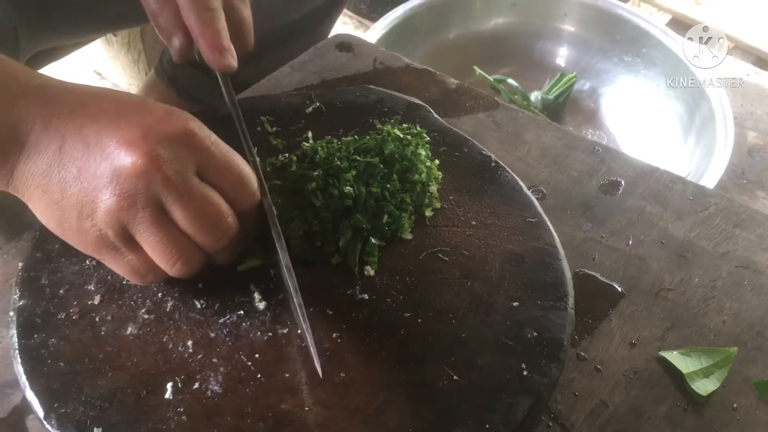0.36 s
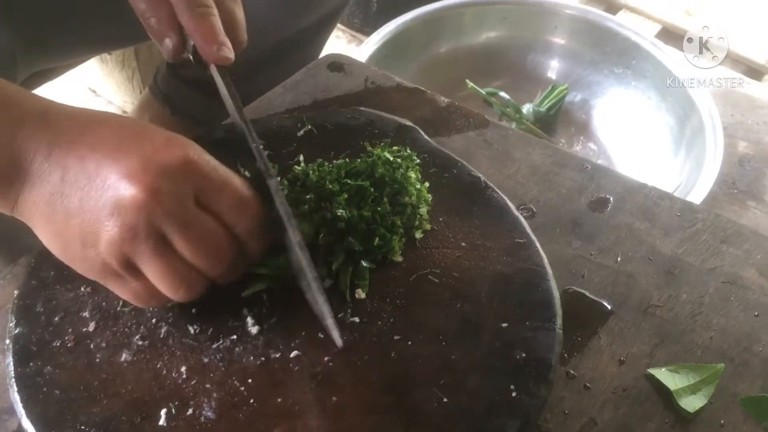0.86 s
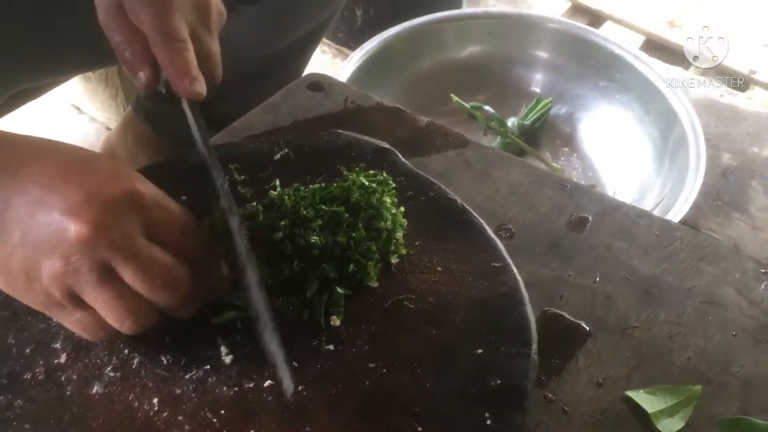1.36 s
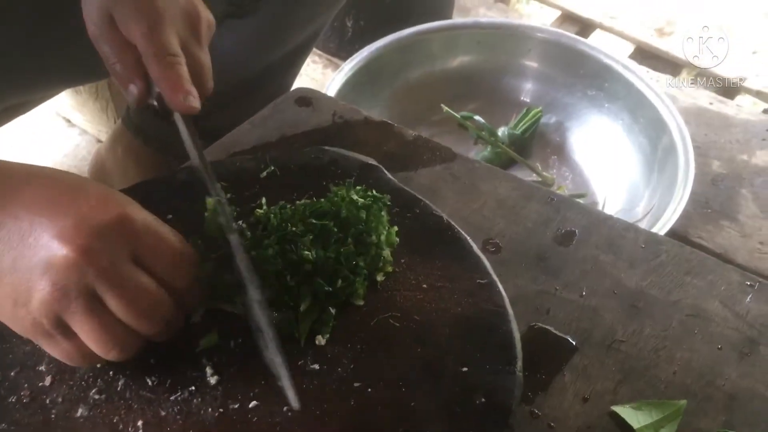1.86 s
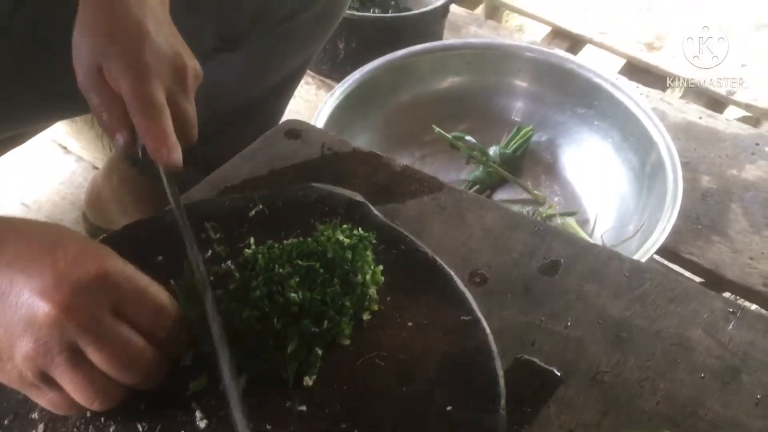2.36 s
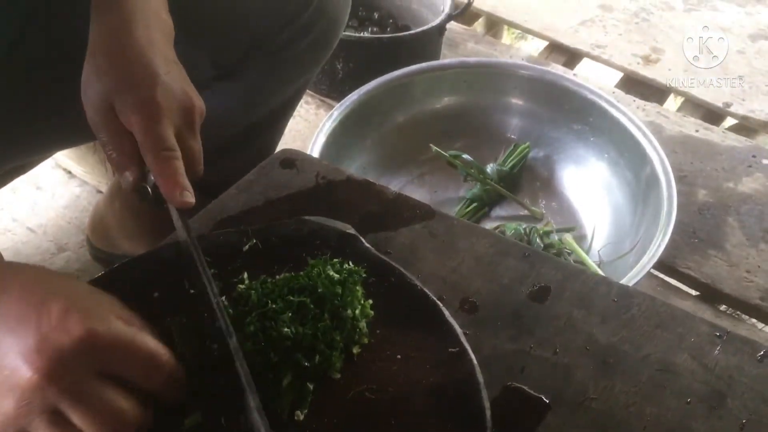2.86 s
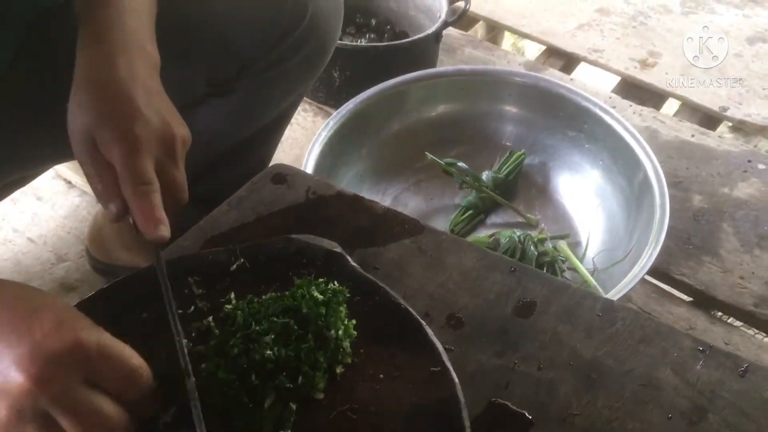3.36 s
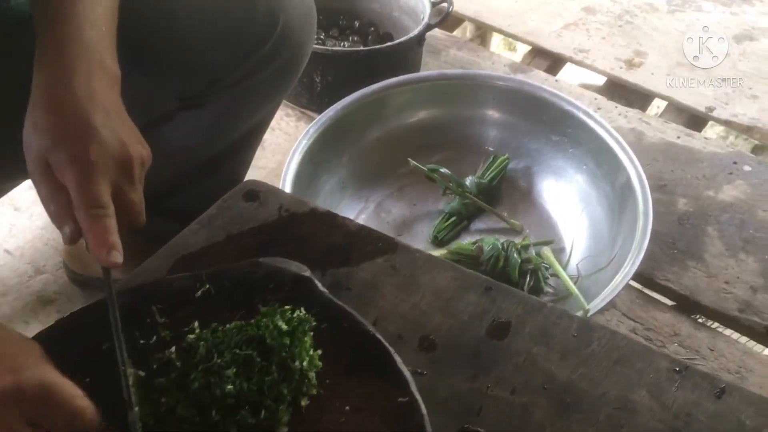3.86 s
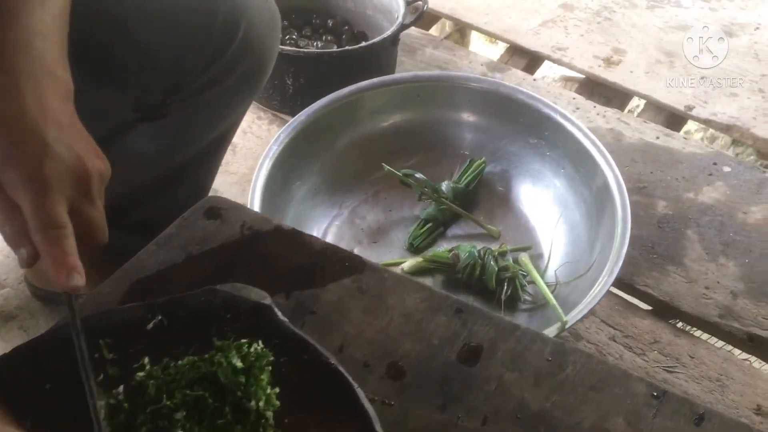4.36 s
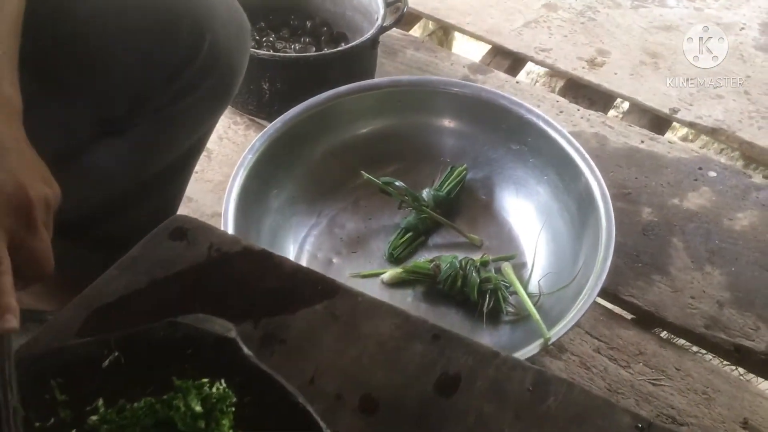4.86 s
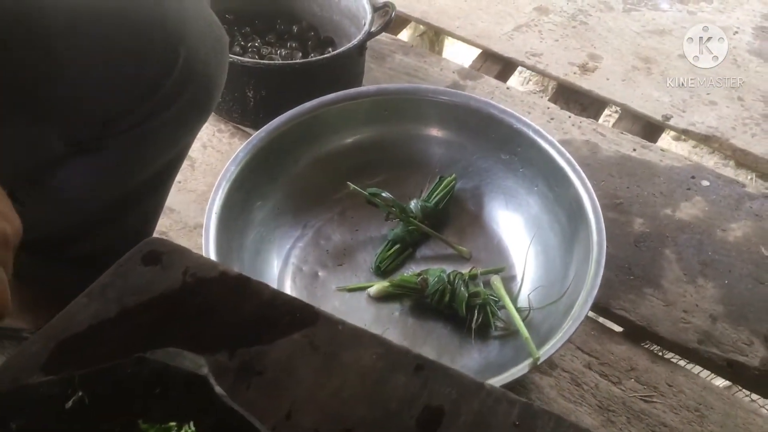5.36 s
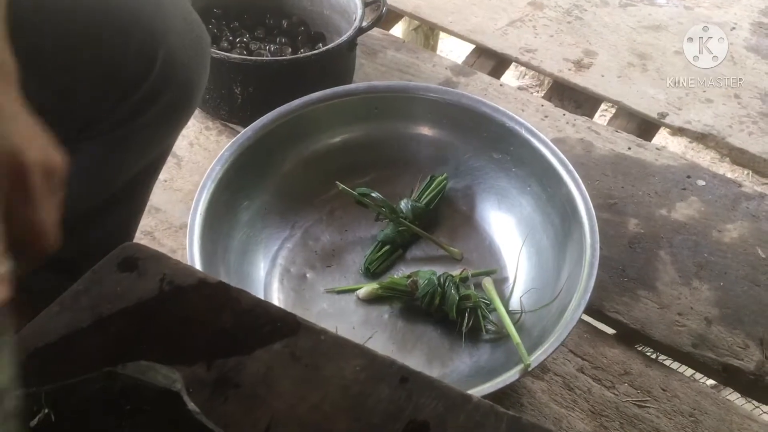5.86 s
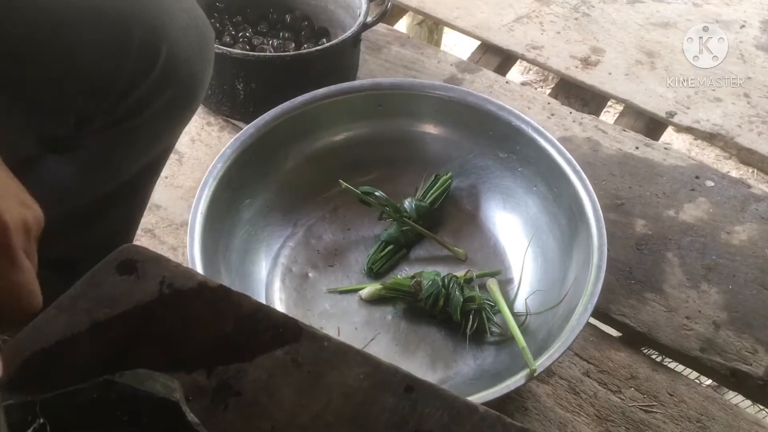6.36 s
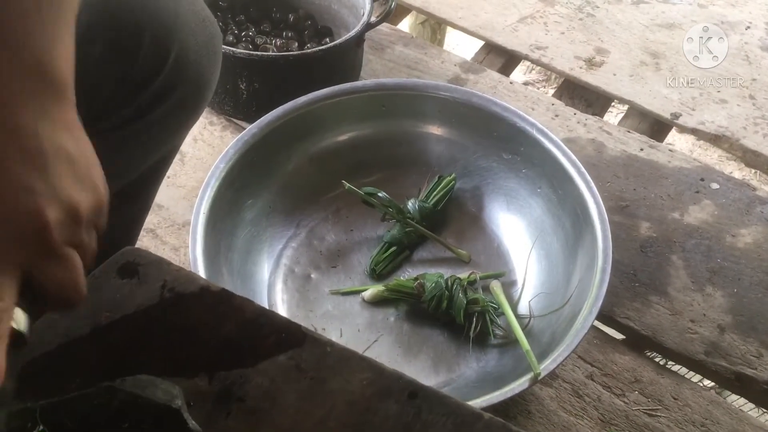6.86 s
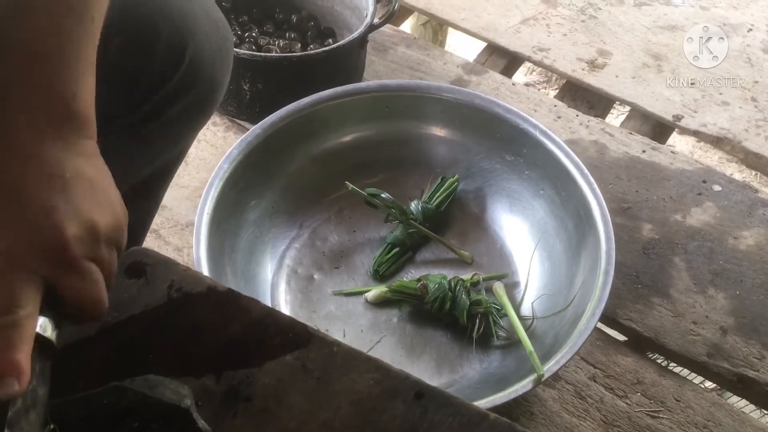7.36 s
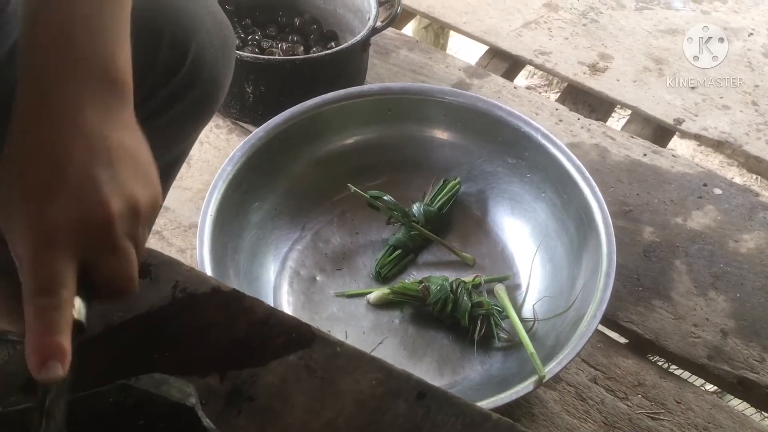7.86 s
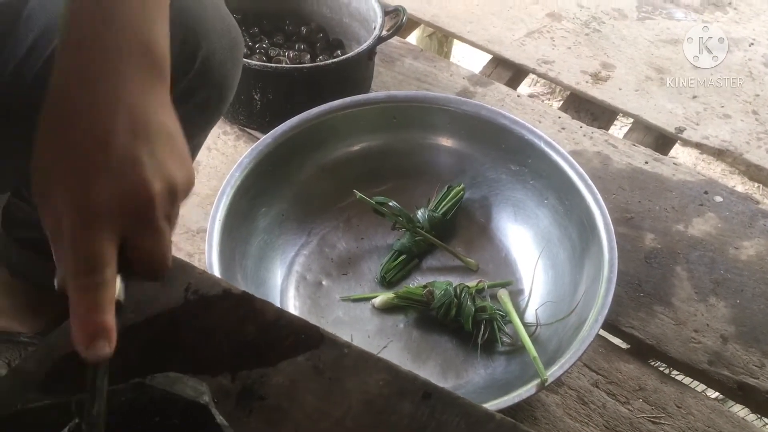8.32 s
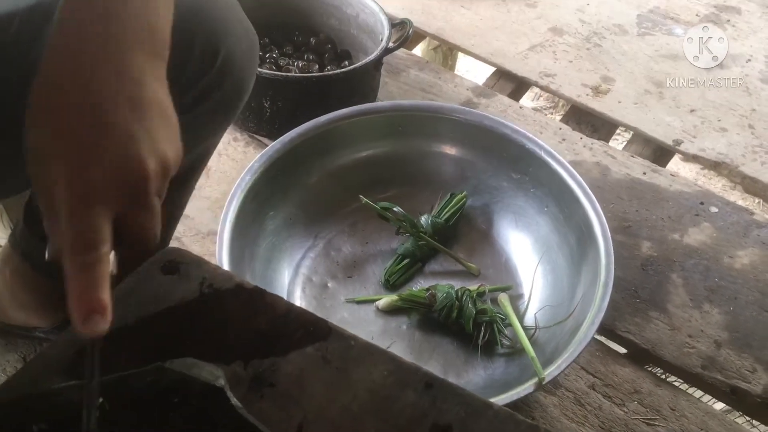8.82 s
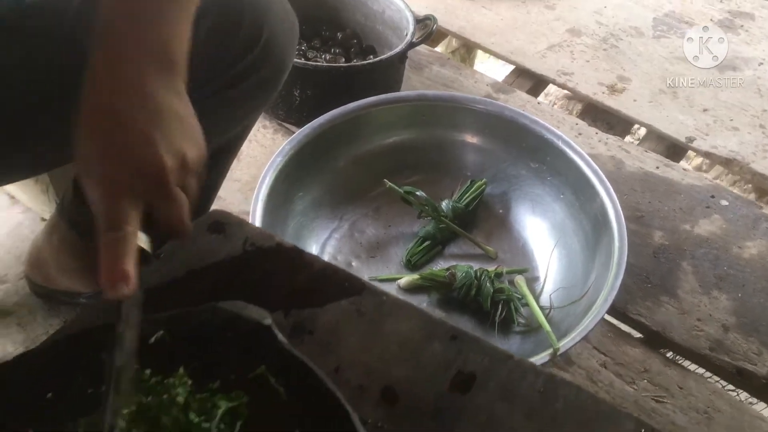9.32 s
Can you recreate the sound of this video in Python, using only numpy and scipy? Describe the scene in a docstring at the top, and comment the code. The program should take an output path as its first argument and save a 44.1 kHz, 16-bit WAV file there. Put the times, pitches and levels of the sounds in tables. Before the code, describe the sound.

A blade chops leafy stems on a thick wooden block in sharp loud knocks with short pauses, then rocking double-hit cuts with leafy scratches.

```python
"""A cleaver chops herbs on a thick round wooden block in an open kitchen, close to a phone that overloads.
Each blow is a short push that rings the block's modes and cracks; late rocking cuts land belly, then heel.
Noise puffs make stems crunch and the hand bump the block; damped sines make the blade clink and squeak.
Floor and walls answer with decaying noise. Crackling leaves, yard murmur and a far insect are shaped noise."""
import sys
import numpy as np
from scipy import signal
from scipy.io import wavfile

SR = 44100
rng = np.random.default_rng(int(sys.argv[2]) if len(sys.argv) > 2 else 0)


def master_out(mix):
    """Clip the mix to full scale and print it as 16-bit PCM to the path in sys.argv[1]."""
    frames = np.transpose(np.atleast_2d(mix))
    ceiling = np.clip(frames, -1, 1)
    pcm = np.round(ceiling * 32767).astype(np.int16)
    wavfile.write(sys.argv[1], SR, pcm)


def ratio(d):
    """dB to gain"""
    e = np.asarray(d, float) / 20
    return 10 ** e


N = 417186

# Straight chops. Each row: landing in seconds, strength in dB, contact time constant in ms,
# crunch of the stems cut just before in dB, spot (0 near edge, 1 middle of the block).
CHOPS = [(0.0836, -3, 0.18, -20, 0.16), (0.375, -12, 0.39, -26.5, 0.3), (0.933, -2.5, 0.07, -22.5, 0.13),
         (1.1726, -4, 0.051, -25, 0.22), (1.4131, 0.84, 0.018, -24, 0.2), (1.9315, 0.7, 0.016, -31, 0.24),
         (2.1693, 1.4, 0.041, -28, 0.18), (2.3915, 0.7, 0.023, -40.5, 0.21), (3.0974, -1, 0.02, -60, 0.25),
         (3.3608, 1.8, 0.0095, -35, 0.26), (3.595, 0.66, 0.029, -30.5, 0.21),
         (3.828, 0.3, 0.016, -33.5, 0.24), (4.336, 0.5, 0.041, -33, 0.76), (4.5793, 0.8, 0.059, -31, 0.83),
         (4.8238, 1, 0.048, -39.5, 0.8), (5.0775, 0.4, 0.05, -45, 0.81), (5.3397, 1, 0.039, -44.5, 0.77),
         (5.5915, 1.2, 0.02, -45, 0.76), (6.135, -3.5, 0.32, -71, .26)]
# Rocking cuts. Each row: belly landing in seconds, belly strength in dB, heel delay in seconds,
# heel strength in dB, heel contact time constant in ms.
ROCKS = [(6.7896, 2.23, .0159, -3, 0.27), (7.197, 2.13, 0.011, 2.2, 0.13), (7.6204, 1.67, .0136, 3, 0.2),
         (8.0365, 2, 0.013, 4.5, 0.21), (8.436, -1.5, .0247, -5.5, 0.34), (8.863, 2.5, .014, 5.5, 0.24),
         (9.2826, 0.5, 0.013, 4, 0.21)]
BELLY_SPOT, BELLY_SPOT_PER_DB, BELLY_CONTACT_MS = 0.5, 0.44, 0.31  # harder cuts land further in
HEEL_SPOT, HEEL_SPOT_PER_DB = 1.985, 0.01  # spot 2 is the heel's place
# Blade set down lightly on the block. Each row: time in seconds, strength in dB.
TAPS = [(4.721, -21), (4.778, -19.5)]
TAP_SPOT, TAP_CONTACT_MS = 0.3, 0.25

# Modes of the block. Each row: frequency in Hz, T60 in seconds, signed gain when struck at spot 0, 1, 2.
BLOCK_MODES = [(56.3, 0.19, 0.0296, 0.0265, -0.012), (76, 0.17, -0.053, -0.0305, 0.0036),
               (145.8, 0.19, 0.13, 0.11, -0.153), (194, 0.13, 0.24, 0.18, 0.21),
               (260, 0.08, 0.21, 0.12, 0.076), (290.5, 0.074, -0.64, -0.48, 0.2),
               (313, 0.14, 0.083, 0.0044, 0.23), (366.6, 0.098, -0.15, -0.15, 0.17),
               (486, 0.026, 0.37, 0.27, -0.83), (584, 0.14, -0.014, -0.075, 0.069),
               (638, 0.068, -0.097, -0.24, 0.052), (721, 0.024, -0.24, 0.035, -0.45),
               (785, 0.089, 0.01, 0.15, 0.079), (902, 0.035, -0.37, -0.35, 0.13),
               (980, 0.035, 0.37, 0.78, -0.068), (1043, 0.03, -0.71, -0.019, 0.4),
               (1104, 0.085, 0.1, 0.17, 0.034), (1236, 0.032, 0.23, 0.28, -0.055),
               (1353, 0.076, -0.37, -0.32, -0.044), (1446.4, 0.036, 0.99, 0.22, 0.21),
               (1530, 0.032, -0.51, -0.21, -0.42), (1636, 0.029, 1, -0.83, 0.013),
               (1882, 0.022, -0.46, 0.31, -0.0015), (2051, 0.027, -0.31, 0.31, 0.063),
               (3001, 0.014, 0.35, -0.5, 0.31)]
MODE_SPREAD_DB = 1.3
# Late steel ring of the heel. Columns: frequency in Hz, T60 in seconds, level in dB for a 0 dB landing.
HEEL_RING = (4170, .13, -62)
HEEL_RING_LAG_S = 0.008

CRACK_DB, CRACK_DB_PER_MS, CRACK_DB_PER_SPOT = -26, -26, -2.5  # last: past the middle only
CRUNCH_LEAD_S, CRUNCH_LEAD_S_PER_MS = 0.003, 0.0046  # soft contacts crunch earlier
CRUNCH_HZ, CRUNCH_DULLING_PER_MS, CRUNCH_S = 9400, 5.4, 0.0031  # and lower
BITE_LEAD_S, BITE_DB, BITE_HZ = 0.0053, -38, 2240  # dB against the belly strength
# Lone snaps and scratches in the heap. Each row: start in seconds, level in dB, centre in Hz, hold in seconds.
SNAPS = [(0.327, -26, 6300, 0.0052), (0.685, -41.5, 6600, 0.0016), (0.8375, -31, 8000, 0.0016),
         (5.932, -46, 4170, 0.048), (6.015, -47, 1850, 0.017), (6.886, -42, 7000, .006),
         (7.093, -47.5, 4000, 0.038), (7.327, -42.5, 8000, 0.019), (7.644, -58, 4640, 0.04),
         (7.683, -40, 2950, .012), (7.72, -48.5, 4470, 0.016), (7.779, -44, 6000, .003),
         (7.797, -52, 3300, 0.0057), (7.874, -37, 8000, 0.0019), (8.137, -34, 12400, 0.0023),
         (8.732, -39.5, 6200, 0.004), (9.205, -52.5, 1500, 0.034)]
# Blade slides through the leaves after a rocking cut. Each row: start in seconds, level in dB.
SLIDES = [(6.824, -40.5), (8.098, -43), (8.503, -44.5), (8.934, -45.5), (9.307, -42)]
SLIDE_HZ, SLIDE_S = 7660, 0.058
RUB_HZ, RUB_DB, RUB_LAG_S = 1540, -7, 0.018  # dB against the slide

# Blade touches something hard. Each row: time in seconds, steel ring in dB, place on the blade from 0 to 2,
# dull knock in dB.
CLINKS = [(2.9969, -29.5, 0.042, -34.5), (3.048, -40.5, 1, -33), (3.8033, -43.5, 1.8, -40.5),
          (3.885, -45, 0.2, -33), (4.7204, -35.5, .5, -38.5), (6.7183, -39, 1.1, -34.5),
          (6.934, -34, 2.03, -38.5)]
# Blade mode frequencies in Hz.
BLADE_HZ = [1810, 4368, 4792, 5130, 5620, 6580, 7400, 7784, 8750, 11800, 13000]
# One row per blade mode: T60 in seconds, relative dB when touched at place 0, 1, 2.
BLADE_MODES = [(0.078, 2.5, -13.5, 8.5), (0.18, 4, -24.5, -7.5), (0.11, 4, -13, -21.5),
               (0.047, -12, -24.5, -8), (0.16, -17.5, -8, -2.5), (0.12, -25, -9, -5.5), (.1, -22, -4, -23),
               (0.091, -2.5, -13, -29.5), (0.12, -21.5, -1.5, -10.5), (0.1, -14, -9.5, -25.5),
               (0.078, -21.5, -6, -8.5)]
CLINK_KNOCK_HZ = 770
# Edge drags over the wood. Columns: start in seconds, hold in seconds, level in dB.
DRAG = (3.882, 0.026, -37)
# Gliding bands of the drag. Each row: starting frequency in Hz, glide in Hz per second, relative dB.
SQUEAK = [(1070, 2600, 3), (1950, -1000, -1), (2203, 301, -3)]
SQUEAK_WAVER_TOP_HZ, SQUEAK_T60_S = 210, 0.2
# Stiff stem flicks against the blade. Each row: time in seconds, ring level in dB.
FLICKS = [(7.9114, -35.5), (7.9647, -37)]
FLICK_HZ, FLICK_T60_S = 1950, 0.066
FLICK_CLICK_DB, FLICK_CLICK_HZ, FLICK_CLICK_T60_S = -2.5, 4070, 0.069  # dB against the ring
# Hand bumps the block. Each row: time in seconds, level in dB, centre in Hz.
BUMPS = [(0.33, -25, 88), (0.523, -41.5, 460), (5.263, -37, 406), (6.723, -40, 253), (8.605, -42.5, 304)]

# Diffuse answer of floor boards and walls. Each row: frequency in Hz, relative dB, T60 in seconds.
TAIL = [(49.4, 7.5, 0.62), (130, -3.5, 0.43), (328, -4, 0.17), (705, 2.5, 0.17), (1500, -1.5, 0.18),
        (2400, -0.5, 0.087), (4000, -3.5, 0.31), (8000, -2.5, 0.074), (15000, -3.5, 0.054)]
TAIL_DB = -36.5
# Blow reaching the floor boards directly. Columns: low edge in Hz, high edge in Hz, gain in dB.
FLOOR_PATH = (690, 2000, 18)
# Leaves pushed about. Each row: time in seconds, level between 3 and 9 kHz in dB.
RUSTLE = [(0.0, -59), (0.61, -61), (0.79, -55.5), (0.97, -63.5), (1.68, -60), (1.87, -62.5), (2.79, -61.5),
          (3.0, -61), (3.69, -62), (4.27, -57.5), (6.35, -57), (6.68, -54.5), (6.76, -45), (6.81, -52.5),
          (7.0, -51.5), (7.53, -55.5), (7.59, -56.5), (7.65, -44.5), (7.85, -52.5), (8.03, -60.5),
          (8.17, -66), (9.46, -65.5)]
# Leaf spectrum. Each row: frequency in Hz, relative dB per Hz.
LEAVES = [(530, -40), (900, -8.5), (991, -12), (1970, -3.5), (2450, -6.5), (4250, -1.5), (10200, -9.5),
          (12900, -16.5), (16000, -12)]
TICKS_PER_S, TICK_DB, TICK_T60_CYCLES = 5, 13, 90  # per band
# Murmur spectrum of the yard. Each row: frequency in Hz, relative dB per Hz.
AIR = [(18, -33), (30, -5.5), (71, -0.5), (204, 1), (721, -13), (1390, -8), (2540, -21), (4080, -12),
       (4910, -30), (12600, -35.5), (16000, -29.5)]
AIR_DB = -56
# Faint thin buzz far off. Columns: start in seconds, end in seconds, centre in Hz, half width in Hz, level in dB.
INSECT = (8.19, 8.76, 6620, 150, -73)
CEILING, CUTOFF_HZ = 0.97, 16500


def rms_one(x):
    """Scales to an rms of 1."""
    return x / np.sqrt(np.mean(x ** 2) + 1e-20)


def at_hz(points, hz, column=1):
    """Reads a table column at hz, on a log frequency axis."""
    table = np.array(points)
    return np.interp(np.log(hz), np.log(table[:, 0]), table[:, column])


def band(x, low_hz, high_hz):
    """Butterworth band-pass."""
    edges_hz = [low_hz, min(high_hz, 0.45 * SR)]
    return signal.sosfilt(signal.butter(2, edges_hz, "band", fs=SR, output="sos"), x)


def half_octaves(low_hz, count):
    """Low edge, high edge and centre of each half octave, in Hz."""
    edges = low_hz * 2 ** (np.arange(count + 1) / 2)
    return zip(edges, edges[1:], np.sqrt(edges[1:] * edges[:-1]))


def drift(corner_hz):
    """Slow chance of spread 1: noise through a double pole, at one value per 40 samples."""
    r = np.exp(-80 * np.pi * corner_hz / SR)
    noise = rng.standard_normal(N // 40 + 2002)
    slow = signal.lfilter([1], [1, -2 * r, r * r], noise)[2000:]
    return np.interp(np.arange(N) / 40, np.arange(len(slow)), rms_one(slow))


def ring(force, hz, t60_s):
    """Damped resonator: a unit click sets a sine of height 1 ringing."""
    r, w = ratio(-60 / (t60_s * SR)), 2 * np.pi * hz / SR
    return signal.lfilter([0, np.sin(w)], [1, -2 * r * np.cos(w), r * r], force + 1e-18)


def add(out, start_s, sound):
    """Mixes a sound in at its start, cut at the end of the scene."""
    i = round(start_s * SR)
    out[..., i:i + sound.shape[-1]] += sound[..., :N - i]


def puff(db, hz, t60_s, hold_s=0, rise_s=0.00023, octaves=0.59):
    """Crackly noise, octaves to either side of hz, that rises, holds, then dies."""
    t = np.arange(round(0.3 * SR)) / SR
    grains = rng.standard_normal(len(t)) * ratio(3.8 * rng.standard_normal(len(t)))
    shape = (1 - np.exp(-t / rise_s)) * ratio(-60 * np.maximum(t - hold_s, 0) / t60_s)
    return ratio(db) * shape * rms_one(band(grains, hz * 2 ** -octaves, hz * 2 ** octaves))


def scratch(db, hz, hold_s):
    """Broad puff; longer ones rise and die more slowly."""
    return puff(db, hz, 0.005 + 0.83 * hold_s, hold_s, rise_s=0.0007 + 17 * hold_s ** 2, octaves=0.99)


def landings():
    """Chops and both landings of each rocking cut, in order: seconds, dB, spot, contact ms."""
    rows = [(s, db, spot, ms) for s, db, ms, _, spot in CHOPS]
    for s, belly_db, heel_delay_s, heel_db, heel_ms in ROCKS:
        belly_spot = BELLY_SPOT + BELLY_SPOT_PER_DB * belly_db
        heel_spot = HEEL_SPOT + HEEL_SPOT_PER_DB * heel_db
        rows.append((s, belly_db, belly_spot, BELLY_CONTACT_MS))
        rows.append((s + heel_delay_s, heel_db, heel_spot, heel_ms))
    return rows


def blows():
    """Force on the three spots: a push that rises and falls, longer when leaves cushion the contact."""
    force, t = np.zeros((3, N)), np.arange(400) / SR
    taps = [(s, db, TAP_SPOT, TAP_CONTACT_MS) for s, db in TAPS]
    for s, db, spot, contact_ms in landings() + taps:
        push = (t + 0.5 / SR) * np.exp(-t * 1000 / max(contact_ms, 0.005))
        share = np.maximum(1 - abs(np.clip(spot, 0, 2) - np.arange(3)), 0)
        add(force, s, ratio(db) * np.outer(share, push / push.sum()))
    return force


def block(force):
    """Every mode hears the spots with its own sign and gain, varied a little from landing to landing."""
    landing = np.searchsorted(np.array(landings())[:, 0] * SR, np.arange(N) + 1.5)
    chance = ratio(MODE_SPREAD_DB * rng.standard_normal((landing.max() + 1, len(BLOCK_MODES))))
    out = np.zeros(N)
    for k, (hz, t60_s, *gains) in enumerate(BLOCK_MODES):
        drive = np.dot(gains, force) * chance[landing, k]
        out += ring(drive, hz, t60_s)
    return out


def heel_ring():
    """Landings past spot 1.5 ring one steel mode late, strong ones far more than weak ones."""
    (hz, t60_s, ring_db), clicks = HEEL_RING, np.zeros(N)
    for s, db, spot, _ in landings():
        clicks[round((s + HEEL_RING_LAG_S) * SR)] = ratio(ring_db + 3 * db) * (spot > 1.5)
    return ring(clicks, hz, t60_s)


def cracks():
    """The edge cracks on the wood, louder and brighter the shorter the contact."""
    out = np.zeros(N)
    for s, db, spot, ms in landings():
        crack_db = db + CRACK_DB + CRACK_DB_PER_SPOT * max(spot - 1, 0) + CRACK_DB_PER_MS * ms
        add(out, s, puff(crack_db, 3400 / (1 + 4.2 * ms), 0.035, octaves=0.62))
    return out


def crunches_and_snaps():
    """Stems crunch ahead of a chop, leaves give as the belly bites, lone stems snap and scratch."""
    out = np.zeros(N)
    for s, _, ms, db, _ in CHOPS:
        start_s = s - CRUNCH_LEAD_S - CRUNCH_LEAD_S_PER_MS * ms
        add(out, start_s, scratch(db, CRUNCH_HZ / (1 + CRUNCH_DULLING_PER_MS * ms), CRUNCH_S))
    for s, db, *_ in ROCKS:
        add(out, s - BITE_LEAD_S, puff(db + BITE_DB, BITE_HZ, 0.031, 0.006, rise_s=0.0045, octaves=0.73))
    for s, db, hz, hold_s in SNAPS:
        add(out, s, scratch(db, hz, hold_s))
    return out


def slides():
    """The blade scratches through leaves, then its edge rubs the wood in a narrower, lower band."""
    out = np.zeros(N)
    for s, db in SLIDES:
        add(out, s, scratch(db, SLIDE_HZ, SLIDE_S))
        add(out, s + RUB_LAG_S, puff(db + RUB_DB, RUB_HZ, 0.068, 0.05, rise_s=0.013, octaves=0.28))
    return out


def clinks():
    """The place touched sets the mix of steel modes, over a dull knock; the next contact mutes the modes."""
    out, t = np.zeros(N), np.arange(round(0.3 * SR)) / SR
    contacts = np.sort([row[0] for row in landings() + CLINKS + BUMPS] + [N / SR])
    chance_db = rng.normal(0, 0.55, (len(CLINKS), len(BLADE_MODES)))
    for (s, ring_db, place, knock_db), spread_db in zip(CLINKS, chance_db):
        steel = np.zeros(len(t))
        for hz, (t60_s, *place_db), extra_db in zip(BLADE_HZ, BLADE_MODES, spread_db):
            mode_db = np.interp(place, np.arange(3), place_db) + extra_db
            steel += ratio(mode_db - 60 * t / t60_s) * np.sin(2 * np.pi * hz * t)
        free_s = contacts[contacts > s][0] - s
        add(out, s, ratio(ring_db - 4200 * np.maximum(t - free_s, 0)) * steel)
        add(out, s, puff(ring_db - 0.5, 4600, 0.09))
        add(out, s, puff(knock_db, CLINK_KNOCK_HZ, 0.11, rise_s=0.001, octaves=0.35))
    return out


def drag():
    """Stick and slip of the edge: wavering narrow bands that glide, hold and die."""
    out, (s, hold_s, db), t = np.zeros(N), DRAG, np.arange(round(0.3 * SR)) / SR
    shape = (1 - np.exp(-t / 0.002)) * ratio(db - 60 * np.maximum(t - hold_s, 0) / SQUEAK_T60_S)
    for hz, hz_per_s, squeak_db in SQUEAK:
        waver = rms_one(band(rng.standard_normal(len(t)), 10.2, SQUEAK_WAVER_TOP_HZ))
        glide = np.sin(2 * np.pi * (hz + hz_per_s * t / 2) * t)
        add(out, s, ratio(squeak_db) * shape * (0.84 + waver) * glide)
    return out


def flicks():
    """A sharp noise click and one short damped ring."""
    out, clicks = np.zeros(N), np.zeros(N)
    for s, db in FLICKS:
        clicks[round(s * SR)] = ratio(db)
        add(out, s, puff(db + FLICK_CLICK_DB, FLICK_CLICK_HZ, FLICK_CLICK_T60_S, octaves=0.79))
    return out + ring(clicks, FLICK_HZ, FLICK_T60_S)


def bumps():
    """A hand bumps the block: dull puffs of noise."""
    out = np.zeros(N)
    for s, db, hz in BUMPS:
        add(out, s, puff(db, hz, 0.2, rise_s=0.0016, octaves=0.71))
    return out


def tail(source):
    """Floor boards and walls answer with noise that swells and dies band by band."""
    t = np.arange(round(0.8 * SR)) / SR
    answers = np.zeros((4, len(t)))
    for low, high, hz in half_octaves(34.57, count=18):
        dying = (1 - np.exp(-t / 0.00018)) * ratio(-60 * t / at_hz(TAIL, hz, column=2))
        answers += ratio(at_hz(TAIL, hz)) * dying * band(rng.standard_normal((4, len(t))), low, high)
    # hands and heap shift between blows: four answers take turns
    turn = np.searchsorted(np.array(landings())[:, 0] * SR, np.arange(N), side="right") % 4
    out = np.zeros(N)
    for k, answer in enumerate(answers):
        out += signal.fftconvolve(source * (turn == k), answer)[:N]
    return ratio(TAIL_DB) * out


def rustle():
    """Dense crackle of leaves in clumps, each band with its own flicker and lone ticks at one pitch."""
    out, clumps = np.zeros(N), drift(39)
    grains = rng.standard_normal((2, N)) * ratio(3.9 * np.minimum(rng.exponential(1, (2, N)), 6.5))
    for k, (low, high, hz) in enumerate(half_octaves(800, count=9)):
        ticks = (rng.random(N) < TICKS_PER_S / SR) * ratio(TICK_DB + 3 * rng.standard_normal(N))
        pitch_hz = min(rng.uniform(low, high), 0.4 * SR)
        ringing = band(ring(ticks, pitch_hz, TICK_T60_CYCLES / pitch_hz), low, high)
        crackle = band(grains[k % 2], low, high) + np.sqrt(hz / SR) * ringing * np.std(grains)
        flicker_db = 2.5 * clumps + 3.5 * drift(15)
        out += ratio(at_hz(LEAVES, hz) + flicker_db) * crackle
    level_db = np.interp(np.arange(N) / SR, *np.transpose(RUSTLE))
    return ratio(level_db) * out / np.std(band(out, 3000, 9000))


def air():
    """The steady murmur of the yard and the microphone's hiss: noise bands that waver slightly."""
    white, out = rng.standard_normal((2, N)), np.zeros(N)
    for k, (low, high, hz) in enumerate(half_octaves(30, count=19)):
        out += ratio(at_hz(AIR, hz) + 0.57 * drift(7)) * band(white[k % 2], low, high)
    return ratio(AIR_DB) * rms_one(out)


def insect():
    """A narrow band of noise that fades in and out."""
    start_s, end_s, hz, half_width_hz, db = INSECT
    t = np.arange(N) / SR
    fade = np.clip(np.minimum(t - start_s, end_s - t) / 0.03, 0, 1)
    low, high = hz - half_width_hz, hz + half_width_hz
    buzz = band(band(rng.standard_normal(N), low, high), low, high)
    return ratio(db) * fade * rms_one(buzz)


def scene():
    """Near sounds, their tail with the blow's direct path to the floor, and the background."""
    force = blows()
    near = block(force) + heel_ring() + cracks() + crunches_and_snaps() + slides()
    near = near + clinks() + drag() + flicks() + bumps()
    low_hz, high_hz, floor_db = FLOOR_PATH
    through_floor = ratio(floor_db) * band(force.sum(axis=0), low_hz, high_hz)
    return (near + tail(near + through_floor) + rustle() + air() + insect())[None]


def low_pass(x):
    """Removes everything above the highest recorded frequency."""
    return signal.sosfilt(signal.butter(12, 16460, fs=SR, output="sos"), x)


def record(dry):
    """The microphone drops the deepest bass, the loudest peaks hit the ceiling, the top is cut."""
    thin = signal.sosfilt(signal.butter(2, 35.0, "high", fs=SR, output="sos"), dry)
    flat = np.clip(thin, -CEILING, CEILING)
    mix = signal.sosfilt(signal.cheby2(16, 60, CUTOFF_HZ, fs=SR, output="sos"), flat)
    return low_pass(mix)


dry = scene()
out = record(dry)
master_out(out)
```